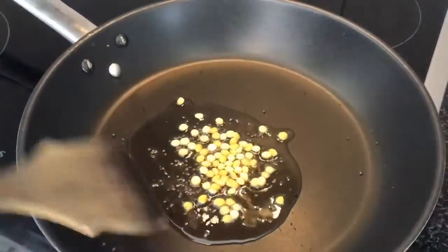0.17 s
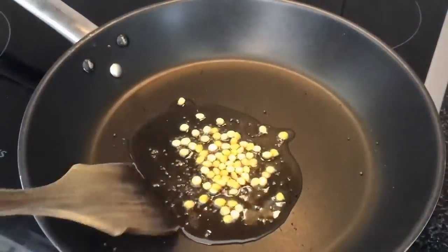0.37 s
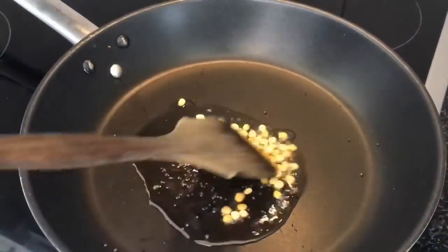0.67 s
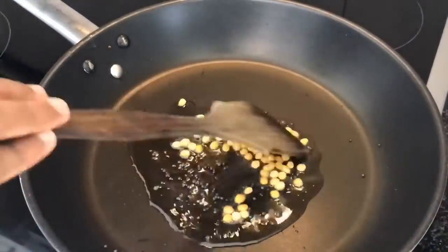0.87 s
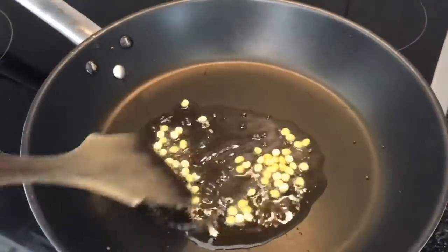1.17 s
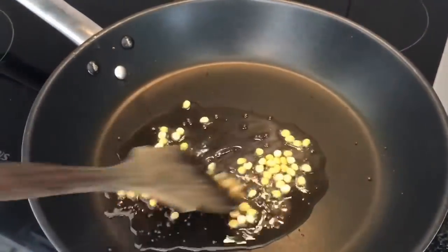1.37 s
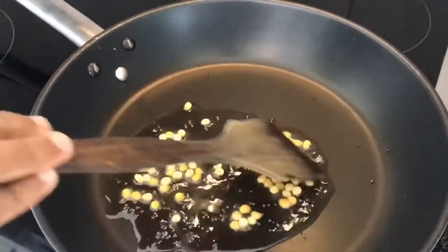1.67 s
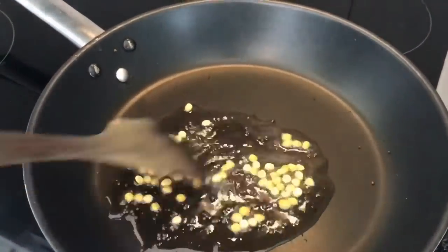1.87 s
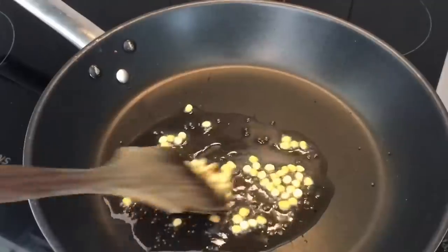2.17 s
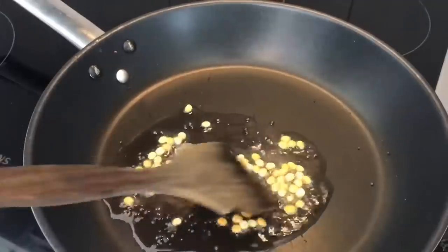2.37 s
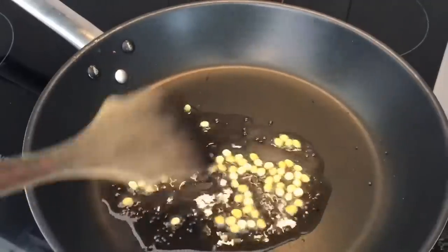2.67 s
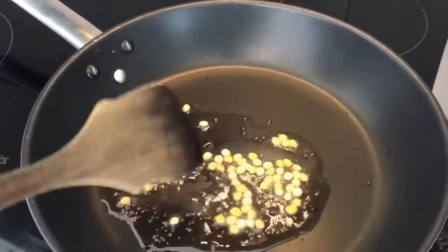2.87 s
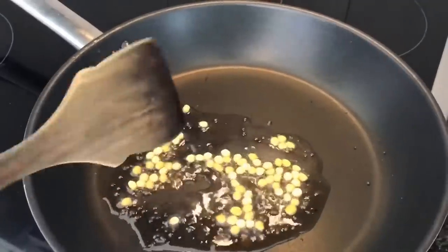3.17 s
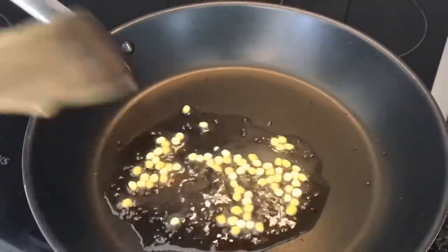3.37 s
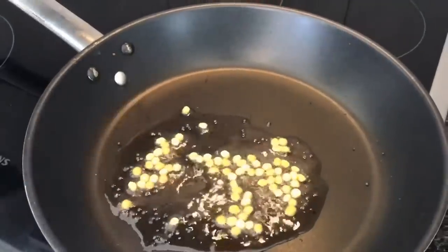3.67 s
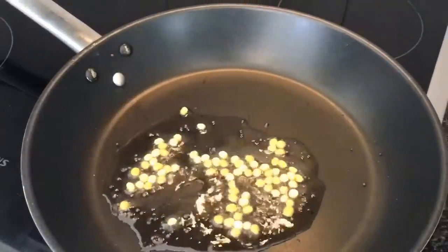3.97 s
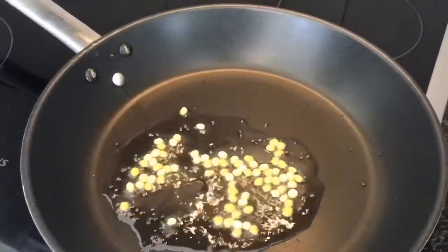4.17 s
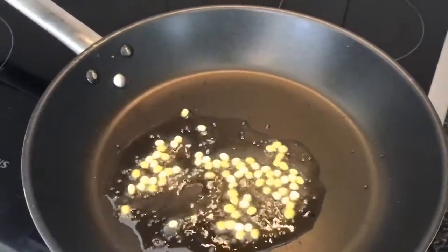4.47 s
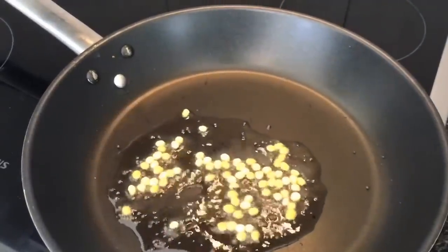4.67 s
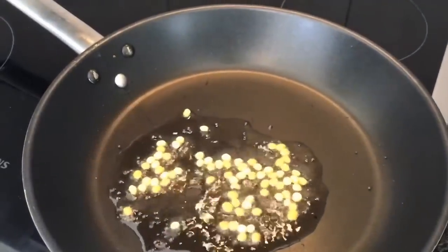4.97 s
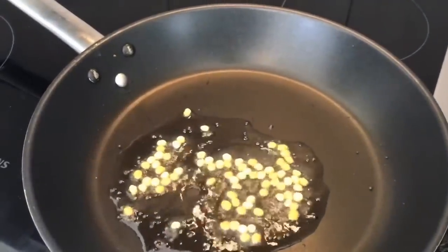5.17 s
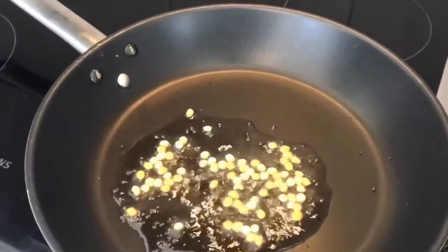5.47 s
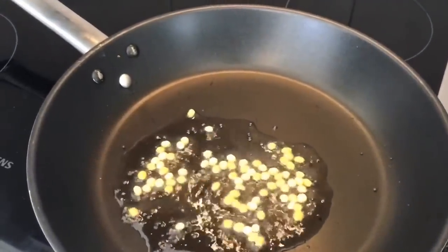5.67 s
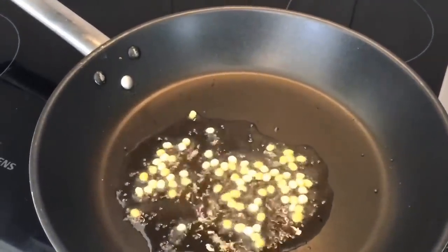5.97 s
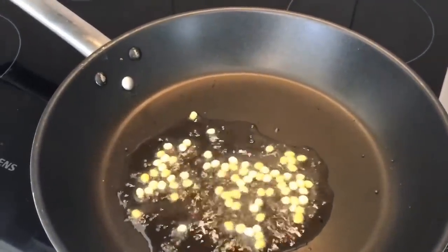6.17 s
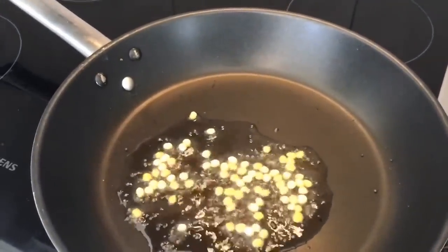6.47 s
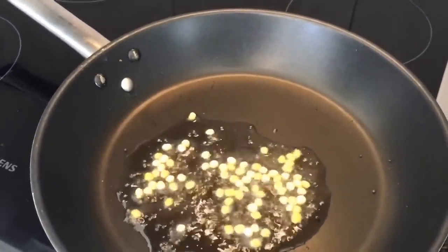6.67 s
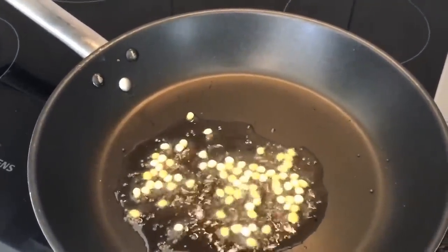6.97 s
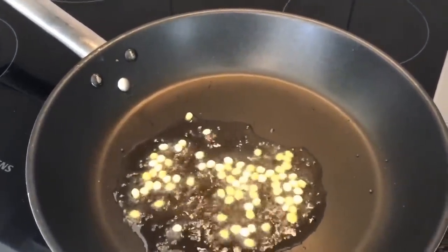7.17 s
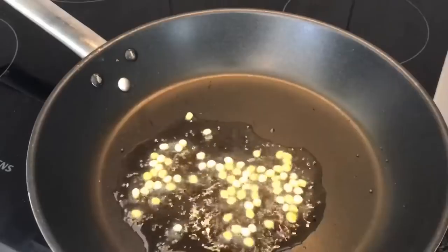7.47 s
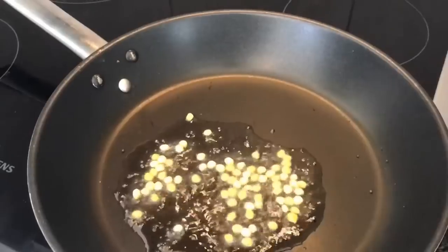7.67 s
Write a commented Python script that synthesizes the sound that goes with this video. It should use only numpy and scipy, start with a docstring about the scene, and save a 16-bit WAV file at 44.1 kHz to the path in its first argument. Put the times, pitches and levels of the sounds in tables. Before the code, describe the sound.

Corn kernels fry in a pan on a humming hob, heard very close. At first wood scrapes and knocks lightly with dull thuds, interrupted by two sharp oil spits whose droplets hit the microphone with falling thumps. The sizzle then continues alone and slowly brightens. Steam jets flutter, another spit thumps hard, and at last one kernel pops violently, making the steel ring and the room echo briefly.

```python
"""Corn kernels heat in a pool of oil in a steel frying pan, over a humming hob (coloured noise and sines).
All along, the oil sizzles (random tiny clicks); at first a wooden spatula rubs and taps (noise bursts).
Now and then the oil spits (sharp clicks), and droplets thump the microphone (gliding, dying sines).
Later, two short puffs of noise are heard, then kernels vent jets of steam (fluttering noise).
Near the end one kernel bursts (noise cracks) and the pan rings (dying sines); bits land (noise puffs)."""
import sys
import numpy as np
from scipy import signal
from scipy.fft import rfft, irfft, next_fast_len
from scipy.io import wavfile

SR = 44100
rng = np.random.default_rng(int(sys.argv[2]) if len(sys.argv) > 2 else 0)


def dump_mix(stems):
    """Bounce the given channels to the path in sys.argv[1] as a 16-bit WAV at rate SR."""
    frames = np.atleast_2d(stems).T  # one column per channel
    limited = np.clip(frames, -1, 1)  # hard clip at full scale
    pcm = np.round(limited * 32767).astype(np.int16)
    wavfile.write(sys.argv[1], SR, pcm)


N = 343963
TIME = np.arange(N) / SR


# knocks of the bursting kernel against the pan: (time [s], strength [dB])
BURST_KNOCKS = [(6.728, -5.5), (6.7316, -0.5), (6.7669, -6.5)]
# tone of the burst: (frequency [Hz], level [dB per Hz])
BURST_COLOUR = [(80, -17.5), (400, -13.5), (550, -18.5), (800, -8.5), (1150, -12), (1700, -11.5),
                (2150, -2), (2700, -7.5), (3300, -4.5), (4300, -17), (5700, -20), (7300, -30.5),
                (8800, -20.5), (10500, -38.5), (16000, -45.5)]
# how long the kitchen echoes: (frequency [Hz], time to fall 60 dB [s])
KITCHEN_DECAY = [(150, 0.79), (1000, 1), (2200, 1), (5000, 1), (15000, .35)]
# crowds of close pan modes that blur together in the room:
# (frequency [Hz], width [Hz], level [dB], time to fall 60 dB [s])
MODE_CROWDS = [(1156, 43, -42, 0.98), (1480, 510, -44, 1.03), (2038, 130, -39, 1.14),
               (2483, 180, -42, 0.94), (3000, 600, -32, 0.23), (3700, 330, -58, 0.41)]


def kernel_pop(ring):
    """The hull cracks, the pan rings in its modes and the kitchen answers."""
    def crack():
        return from_db(-17.5) * burst_of_noise(t60=0.022) + from_db(-28.0) * burst_of_noise(t60=0.18)

    out = tinted(play(BURST_KNOCKS, 1, crack), BURST_COLOUR)
    t = TIME[:SR]
    blur = 0
    for hz, width_hz, db, t60 in MODE_CROWDS:
        blur = blur + from_db(db - 60 * t / t60) * band_noise(SR, hz, width_hz)
    kitchen = from_db(-39.5) * dying_noise(BURST_COLOUR, KITCHEN_DECAY)
    first_knock_s = BURST_KNOCKS[0][0]
    add(out, first_knock_s, from_db(-0.5) * ring)
    add(out, first_knock_s, blur + kitchen)
    return out


# pitches at which the pan rings: (frequency [Hz])
PAN_HZ = [415, 727, 1104, 1134, 1577, 1863, 1950, 1976, 2051, 2068, 2103, 2130, 2158, 2184, 2402, 2455,
          2485, 2552, 2745, 3090, 3150, 3462, 3798, 3866, 3965, 4285, 4814, 5670, 6535, 8480]
# one row for each of those pitches: (level [dB], time to fall 60 dB [s])
PAN_MODES = [(-45.5, 0.87), (-50, 0.78), (-38.5, 0.21), (-22, 0.29), (-41, 0.32), (-42.5, 0.68), (-42, 1),
             (-38, 0.4), (-35, 0.73), (-41.5, 0.89), (-23, .5), (-35, 0.67), (-28, 0.28), (-28, .4),
             (-31, .35), (-38.5, .8), (-25.5, 0.28), (-37, 0.34), (-44.5, 0.78), (-26.5, 0.04), (-41, 0.29),
             (-37, .3), (-37.5, .26), (-41, 0.37), (-42, 0.49), (-44.5, 0.24), (-45, .3), (-38.5, 0.21),
             (-47.5, 0.14), (-45, 0.11)]


def pan_modes():
    """The pan's ring after one blow: dying sines, which room echoes make waver more and more."""
    t = TIME[:3 * SR // 2]
    knots_s = np.arange(60) / 22
    direct = np.exp(-t / 0.6)
    echo_growth = 1 - np.exp(-t / 0.0098)
    out = 0
    for hz, (db, t60) in zip(PAN_HZ, PAN_MODES):
        echoes = np.interp(t, knots_s, [1, 1j] @ rng.standard_normal((2, 60)))   # complex: size and phase
        swing = direct + .65 * echo_growth * echoes
        tone = np.imag(swing * np.exp(2j * np.pi * hz * t))
        out = out + rng.choice([-1, 1]) * from_db(db - 60 * t / t60) * tone
    return out


# tone of the hiss: (frequency [Hz], level [dB per Hz])
STEAM_COLOUR = [(300, -45), (600, -19), (900, -15), (1500, -9.5), (2300, -7.5), (2800, -3.5), (3900, 0),
                (5600, -2.5), (7000, -9), (9200, -10), (11500, -17), (16000, -16.5)]
# pan resonances stirred by the steam: (frequency [Hz], width [Hz], level [dB])
STEAM_RINGS = [(2662, 90, -18), (3840, 30, -16), (4470, 23, -17), (4660, 20, -19), (5230, 30, -19.5),
               (5532, 20, -17.5), (5633, 40, -11.5), (5830, 33, -16.5), (6420, 40, -17), (8700, 60, -17.5),
               (9030, 80, -19)]
STEAM_DIRECT_DB = -2   # hiss that comes straight from the jet, relative to its reflections


def steam():
    """Fluttering jets hiss out of split hulls and make the pan sing along."""
    flow, bright, sung = venting()
    flutter = from_db(0.77 * drift(66))
    wall = burst_of_noise(t60=0.082)   # reflections in the pan carve fine peaks into the hiss
    wall[0] += from_db(STEAM_DIRECT_DB) * np.linalg.norm(wall)
    hiss = coloured(signal.oaconvolve(rng.standard_normal(N), wall)[:N], STEAM_COLOUR)
    lower_hiss = flow * butter(hiss, 4500, "low", order=3)
    treble_hiss = bright * butter(hiss, 3400, "high", order=3)
    rings = sum(from_db(db) * resonate(rng.standard_normal(N), hz, width) for hz, width, db in STEAM_RINGS)
    tone = np.sin(2 * np.pi * 1132 * TIME + drift(25))
    singing = rms_one(tone * from_db(2 * drift(30)))
    return flutter * (from_db(3.0) * (lower_hiss + treble_hiss) + bright * rings) + sung * singing


# jets of steam from split hulls:
# (time [s], opens in [s], holds [s], level [dB], treble lift [dB], singing of the pan [dB])
JETS = [(4.795, 0.022, 0.0094, -58, -5.5, -93), (4.867, 0.13, 0.02, -48.5, -1.5, -78),
        (5.067, .04, 0.031, -51.5, -2.5, -90.5), (5.146, 0.052, 0.067, -42, 0, -70),
        (5.408, 0.15, 0.071, -55.5, -1, -75.5), (5.601, 0.079, 0.15, -52, 6, -68.5)]
JET_CLOSE_S, SINGING_FADE_S = 0.059, .11   # time for the hiss and for the pan's tone to fall to 1/e


def venting():
    """Loudness of the hiss, of its treble and of the pan's tone; overlapping jets add in power."""
    jets = []
    for s, open_s, hold_s, db, lift_db, singing_db in JETS:
        flow = from_db(db) * swell(s, open_s, hold_s, JET_CLOSE_S)
        bright = flow * from_db(lift_db)
        sung = from_db(singing_db) * swell(s, open_s, hold_s, SINGING_FADE_S)
        jets.append([flow, bright, sung])
    return np.linalg.norm(jets, axis=0)


# short narrow and wide puffs of noise; the late ones are bits landing and the pan's ring wavering:
# (time of the peak [s], frequency [Hz], width [Hz], level [dB], time from peak to 1/e [s])
NOISE_PUFFS = [(4.514, 2970, 1500, -55.5, 0.022), (4.561, 3280, 1970, -63, 0.036),
               (6.959, 6760, 7000, -52.5, 0.032), (6.964, 7500, 130, -58, .02),
               (7.01, 7420, 200, -62.5, 0.03), (7.082, 4600, 2200, -55.5, 0.038),
               (7.114, 1053, 159, -60, 0.048), (7.322, 8500, 7030, -58, 0.0084)]


def noise_puffs():
    """Short puffs of noise, each swelling and fading in its own band; late ones: bits landing, ring wavering."""
    out = 0
    for s, hz, width_hz, db, length_s in NOISE_PUFFS:
        puff = np.exp(-((TIME - s) / length_s) ** 2)
        out = out + from_db(db) * puff * band_noise(N, hz, width_hz)
    return out


# tone of the sizzle: (frequency [Hz], level [dB per Hz])
SIZZLE_COLOUR = [(530, -49), (900, -23), (1100, -21.5), (1150, -15), (1600, -17), (1770, -13), (2470, -12),
                 (3380, -0.5), (3640, -2), (3960, -1.5), (6970, -8), (15100, -4.5), (16000, -7)]
# loudness of the sizzle: (time [s], level of the larger bubbles [dB], level of the finest bubbles [dB])
SIMMER = [(0, -74.5, -76), (0.8, -70.5, -73.5), (1.6, -68, -69.5), (2.7, -70.5, -69), (4.3, -68, -66.5),
          (6.2, -66, -62), (7.8, -63.5, -59.5)]


def sizzle():
    """Thousands of tiny bubbles click each second; the finest grow louder as the oil heats."""
    body_gain, fine_gain = gains(SIMMER)
    fizz = coloured(grains(per_s=11000, spread_db=1.5), SIZZLE_COLOUR) * from_db(0.4 * drift(11))
    body = rms_one(butter(fizz, 5800, "low"))
    fine = rms_one(butter(fizz, 7000, "high", order=4))
    return body_gain * body + fine_gain * fine


# oil spits: (time [s], level of the crack [dB], level of the splash of room sound [dB])
SPITS = [(.8943, -1.5, -30), (1.5116, -3, -32.5), (1.7615, -16.5, -39), (4.4505, -12, -35.5),
         (5.2966, -4.5, -34.5)]
# tone of the splash: (frequency [Hz], level [dB per Hz])
SPIT_COLOUR = [(300, -13), (1200, -9.5), (3500, 1), (8000, -2), (12000, -6.5), (16000, 0.5)]
# tone of the crack: (frequency [Hz], level [dB per Hz])
CRACK_COLOUR = [(200, -18), (700, -11), (1700, -10), (3200, 1.5), (6000, -9.5), (9300, 5), (12000, -4),
                (14800, 2.5), (16000, -10)]


def spits():
    """Water flashes to steam: one sharp crack, scattered by the pan wall and the room."""
    def scatter():
        return burst_of_noise(t60=0.058) + from_db(-21.0) * burst_of_noise(t60=.3)

    cracks = tinted(play(SPITS, 1, lambda: from_db([-3])), CRACK_COLOUR)   # a single-sample click
    splash = tinted(play(SPITS, 2, scatter), SPIT_COLOUR)
    return cracks + splash


# droplets landing on the microphone:
# (time [s], height [dB], starting pitch above 25 Hz [Hz], time to fall to 1/e [s], pitch of the smack [Hz],
#  dip of the hob's rumble [dB], hold of that dip [s])
DROPLETS = [(0.8945, -18.5, 1460, .011, 2180, 6.5, 0.2), (1.5118, -2, 2050, .012, 2360, 4.5, .08),
            (4.4506, -43.5, 1560, 0.0076, 2027, 1, 0.59), (5.2969, 1, 1570, .0097, 1460, 7, 0.36)]
DROPLET_TAIL_DB, DROPLET_TAIL_HZ, DROPLET_TAIL_T60_S = -40, 420, .06   # a short dull rustle after each thump


def droplets():
    """A droplet smacks the microphone, which swings back ever more slowly: a tone of falling pitch."""
    out, t = np.zeros(N), TIME[:SR // 6]
    for s, db, start_hz, decay_s, smack_hz, *_ in DROPLETS:
        hz = 25 + 1 / (1 / start_hz + t / .62)
        onset = 1 - 0.73 * np.exp(-t / 0.0011)
        swing = np.sin(2 * np.pi * np.cumsum(hz) / SR) * np.exp(-t / decay_s) * onset
        smack = from_db(-6.0) * np.sin(2 * np.pi * smack_hz * t) * np.exp(-t / .0003)
        tail_gain = from_db(DROPLET_TAIL_DB - 60 * t / DROPLET_TAIL_T60_S)
        tail = tail_gain * band_noise(len(t), DROPLET_TAIL_HZ, 600)
        add(out, s, -from_db(db + 1.9) * (swing + smack + tail))
    return out


# tone of the rubbing: (frequency [Hz], level [dB per Hz])
STIR_COLOUR = [(400, -39), (800, -19), (1400, -14), (2000, -4), (2700, -2.5), (3500, -2.5), (4700, -9),
               (7000, -21), (11000, -27), (16000, -40)]
# spatula touching the pan: (time [s], level of the tap [dB], level of the thud [dB], pitch of the tap [Hz])
KNOCKS = [(.251, -55.5, -61.5, 2580), (.502, -54.5, -63, 4230), (0.591, -54, -71, 3000),
          (.64, -59, -77, 2290), (.689, -62.5, -85, 1880), (1.005, -57.5, -87, 3040),
          (1.049, -54.5, -63, 2130), (1.283, -58, -82, 3000), (1.347, -52.5, -39.5, 3320),
          (1.394, -61.5, -67, 2080), (1.426, -60, -56, 3440), (1.491, -52, -45, 3600),
          (1.694, -51.5, -39, 3580), (1.754, -77, -48, 2860), (1.79, -55.5, -51.5, 2340),
          (1.822, -56, -60.5, 2470), (1.861, -57, -78.5, 3260), (1.953, -55.5, -69, 3240),
          (1.975, -51.5, -67, 3510), (2.119, -48, -42.5, 1500), (2.449, -52, -49.5, 3350)]
# tone of the taps: (frequency [Hz], level [dB per Hz])
TAP_COLOUR = [(300, -10), (600, -9.5), (1000, -6), (2100, 0.5), (3500, -1.5), (6000, -4), (9000, -15.5),
              (16000, -23.5)]
# tone of the thuds: (frequency [Hz], level [dB per Hz])
THUD_COLOUR = [(30, -22.5), (55, -10), (80, 8.5), (130, -2), (320, -5), (600, -19.5), (1200, -38),
               (3000, -63.5)]
# how long the thuds last: (frequency [Hz], time to fall 60 dB [s])
THUD_DECAY = [(70, 0.35), (300, 0.33), (900, 0.11)]


def spatula(ring):
    """Wood rubs over seeds and bumps the pan: a light tap above a dull thud of the hob."""
    grit = coloured(grains(per_s=1300, spread_db=0.5), STIR_COLOUR)
    rub = stirring() * grit * from_db(2.5 + 1.1 * drift(70))
    taps, t = np.zeros(N), TIME[:SR // 2]
    for s, db, _, hz in KNOCKS:
        # the pitch of the tick depends on what is hit
        tick = band_noise(SR // 2, hz, 0.47 * hz) * from_db(-3.5 - 60 * t / 0.035)
        click = from_db(-1.0) * burst_of_noise(t60=0.021)
        scatter = from_db(-14.0) * burst_of_noise(t60=0.29)
        add(taps, s, from_db(db) * (tick + click + scatter))
    contact = rub + tinted(taps, TAP_COLOUR)
    # the blade deadens the pan, so its ring is short
    damped = butter(ring[:SR // 4], 1600, "high") * from_db(-60 * TIME[:SR // 4] / .15)
    body = signal.oaconvolve(contact, damped / np.linalg.norm(damped))[:N]
    thud = dying_noise(THUD_COLOUR, THUD_DECAY)
    thuds = play(KNOCKS, 2, lambda: from_db(-2) * thud + rocking())
    return contact + from_db(-16.5) * body + thuds


# strokes of the spatula through the oil: (time [s], push lasts [s], level [dB])
STROKES = [(0.587, 0.052, -62.5), (1.031, 0.082, -60), (1.41, .04, -75.5), (1.826, 0.095, -68),
           (1.941, 0.0085, -61.5), (2.171, 0.085, -63)]
STROKE_RISE_S, STROKE_SETTLE_S = .028, 0.034   # the blade gets going; the seeds come to rest


def stirring():
    """Loudness of the rubbing: each stroke starts, pushes on and lets the seeds settle."""
    strokes = [from_db(db) * swell(s, STROKE_RISE_S, push_s, STROKE_SETTLE_S) for s, push_s, db in STROKES]
    return np.linalg.norm(strokes, axis=0)


# the pan rocks on the hob when it is bumped: (frequency [Hz], level [dB], time to fall 60 dB [s])
ROCKING_MODES = [(73, 0, 0.36), (106, -8.5, 0.24), (150, -9, 0.32), (212, -12, .22), (315, -7, .16),
                 (780, -23.5, .1), (1440, -22.5, 0.034)]


def rocking():
    """Low modes of the pan on the hob, dying sines a little different at every bump."""
    t, out = TIME[:SR], 0
    for k, (hz, db, t60) in enumerate(ROCKING_MODES):
        gain = from_db(db + rng.normal(0, 1.8) - 60 * t / t60)
        out = out + gain * np.sin(2 * np.pi * hz * t) * (-1) ** k
    return out


# tone of the fan's rumble: (frequency [Hz], level [dB per Hz])
FAN_COLOUR = [(20, -56), (30, -33.5), (40, -13), (70, -14), (98, 1.5), (131, -5), (180, -11.5),
              (306, -10.5), (352, -14), (426, -26), (593, -26), (983, -37.5), (1600, -46.5), (3000, -91)]
# electrical hum: (frequency [Hz], level relative to the fan [dB])
HUM = [(50, -14.5), (99.5, -7.5), (1188, -33.5)]
# low rumble of the hob fan: (time [s], level [dB])
FAN_LEVEL = [(0, -64.5), (.7, -61), (2.9, -60), (3.9, -64), (6.2, -60), (7.8, -59)]
DIP_FALL_S, DIP_RECOVER_S = .1, 0.13   # the rumble sinks for a moment after each thump


def hob():
    """Fan rumble with an electrical hum in it; both dip after each droplet's thump."""
    hum = sum(from_db(db) * np.sqrt(2) * np.sin(2 * np.pi * hz * TIME) for hz, db in HUM)
    rumble = coloured(rng.standard_normal(N), FAN_COLOUR)
    dip_db = 0
    for s, *_, depth_db, hold_s in DROPLETS:
        dip_db = dip_db + depth_db * swell(s, DIP_FALL_S, hold_s, DIP_RECOVER_S)
    return gains(FAN_LEVEL)[0] * from_db(-dip_db) * (rumble + hum)


def from_db(db):
    """Decibels to gain."""
    return 10 ** (np.asarray(db) / 20)


def rms_one(x):
    """Scale to unit power."""
    return x / np.sqrt(np.mean(x ** 2) + 1e-20)


def gains(rows):
    """Curves of dB as gains at every sample."""
    s, *columns = np.transpose(rows)
    return [from_db(np.interp(TIME, s, c)) for c in columns]


def at_hz(points, hz):
    """Read a table along log frequency."""
    f, value = np.transpose(points)
    return np.interp(np.log(hz + 0.00079), np.log(f), value)   # the offset avoids log of zero


def add(out, s, sound):
    """Mix a sound in at a time."""
    i = int(round(s * SR))
    out[i:i + len(sound)] += sound[:N - i]


def play(rows, column, response):
    """Sound a response at every event, scaled by the given dB column."""
    out = np.zeros(N)
    for row in rows:
        add(out, row[0], from_db(row[column]) * response())
    return out


def swell(s, rise_s, hold_s, fade_s):
    """Envelope of height 1: a straight rise, a hold, an exponential fade."""
    t = TIME - s
    return np.clip(t / rise_s, 0, 1) * np.exp(-np.clip((t - rise_s - hold_s) / fade_s, 0, 20))


def drift(rate):
    """Random wander with straight lines between new values, `rate` of them a second."""
    knots = rng.standard_normal(800)
    return np.interp(TIME * rate, np.arange(len(knots)), knots)


def grains(per_s, spread_db):
    """Random clicks, mostly small and a few large; rms 1."""
    sizes = from_db(spread_db * np.minimum(rng.exponential(1, N), 5))
    happens = rng.random(N) < per_s / SR
    return rms_one(happens * sizes * rng.choice([-1, 1], N))


def burst_of_noise(t60):
    """Half a second of white noise that falls 60 dB in every t60 seconds."""
    return rng.standard_normal(SR // 2) * from_db(-60 * TIME[:SR // 2] / t60)


def dying_noise(colour, decay):
    """A second of scattered sound, each third-octave dying at its own rate; starts at rms 1."""
    t, edges = TIME[:SR], np.geomspace(30, 17000, 28)
    white = rng.standard_normal((2, SR + SR // 4))   # neighbouring bands take turns
    out, power = 0, 0
    for k, (low, high) in enumerate(zip(edges, edges[1:])):
        hz = np.sqrt(low * high)
        band = butter(white[k % 2], [low, high], "band")[-SR:] * from_db(at_hz(colour, hz))
        out = out + band * from_db(-60 * t / at_hz(decay, hz))
        power += np.mean(band ** 2)
    return out / np.sqrt(power)


def band_noise(size, hz, width_hz):
    """Noise through the same resonance twice, run in so that it starts at full strength."""
    noise = rng.standard_normal(size + SR // 10)
    return resonate(resonate(noise, hz, width_hz), hz, width_hz)[-size:]


def resonate(x, hz, width_hz):
    """One resonance; rms 1."""
    r = np.exp(-np.pi * width_hz / SR)
    return rms_one(signal.lfilter([1, 0, -1], [1, -2 * r * np.cos(2 * np.pi * hz / SR), r * r], x))


def butter(x, hz, kind, order=2):
    """Causal Butterworth filter."""
    return signal.sosfilt(signal.butter(order, np.clip(hz, 10, .48 * SR), kind, fs=SR, output="sos"), x)


def coloured(x, colour):
    """Give a steady sound a spectrum; rms 1."""
    size = next_fast_len(N)
    hz = np.arange(size // 2 + 1) * SR / size
    return rms_one(irfft(rfft(x, size) * from_db(at_hz(colour, hz)), size)[:N])


def tinted(x, colour):
    """Causal (minimum-phase) colouring that keeps the power of white noise."""
    size = 2048
    gain = rms_one(from_db(at_hz(colour, np.arange(size // 2 + 1) * SR / size)))
    fold = np.r_[1, np.full(size // 2 - 1, 2), 1, np.zeros(size // 2 - 1)]   # nothing sounds before the event
    cepstrum = irfft(np.log(gain)) * fold
    return signal.oaconvolve(x, irfft(np.exp(rfft(cepstrum))))[:N]


def scene():
    """Everything heard from just above the pan."""
    ring = pan_modes()
    kernels = kernel_pop(ring) + steam() + noise_puffs()
    oil = sizzle() + spits() + droplets()
    return (kernels + oil + spatula(ring) + hob())[None]


def record(dry):
    """Full scale limits the thumps; a steep filter cuts the top."""
    low_pass = signal.ellip(10, .1, 80, 15900, fs=SR, output="sos")   # ripple and cut in dB, edge in Hz
    return signal.sosfilt(low_pass, np.clip(dry, -1, 1))


dry = scene()
out = record(dry)
dump_mix(out)
```